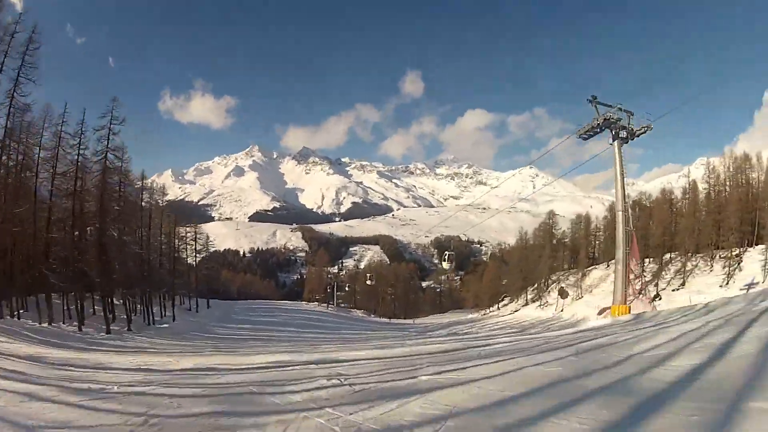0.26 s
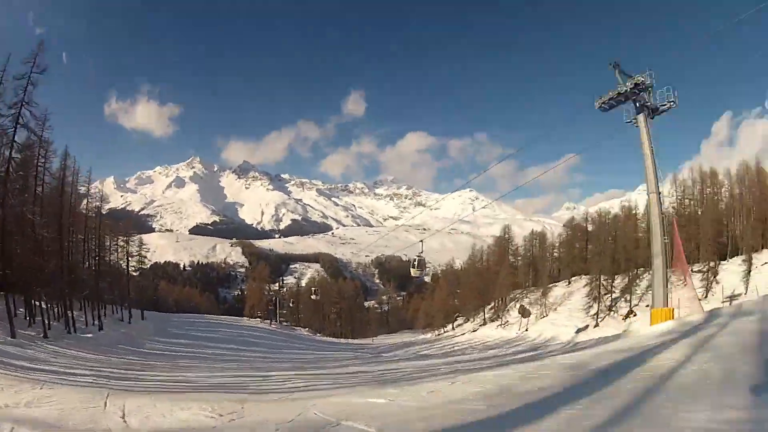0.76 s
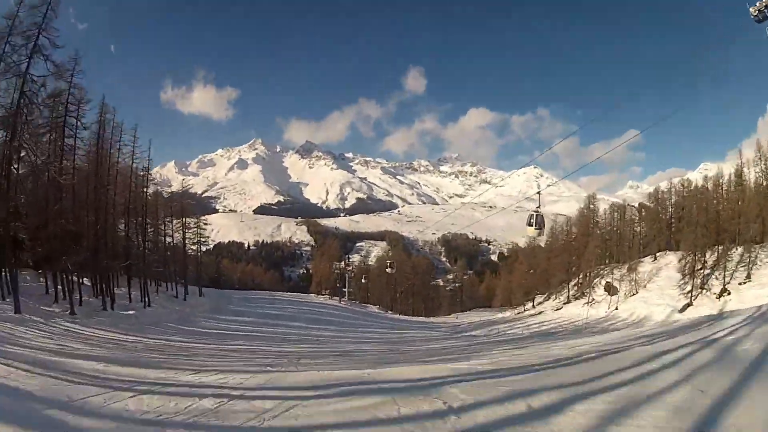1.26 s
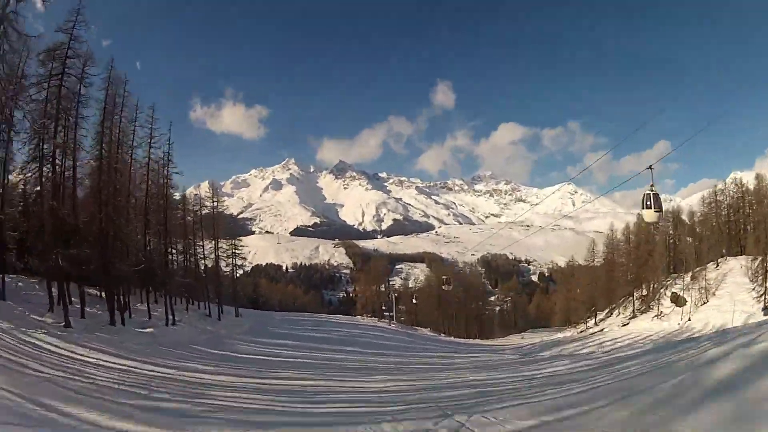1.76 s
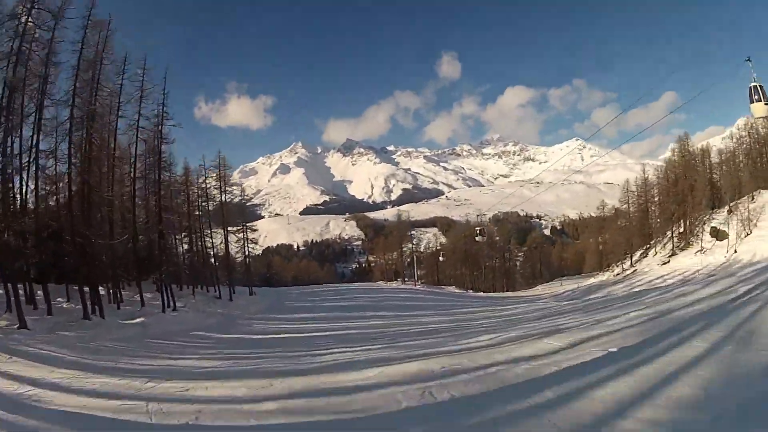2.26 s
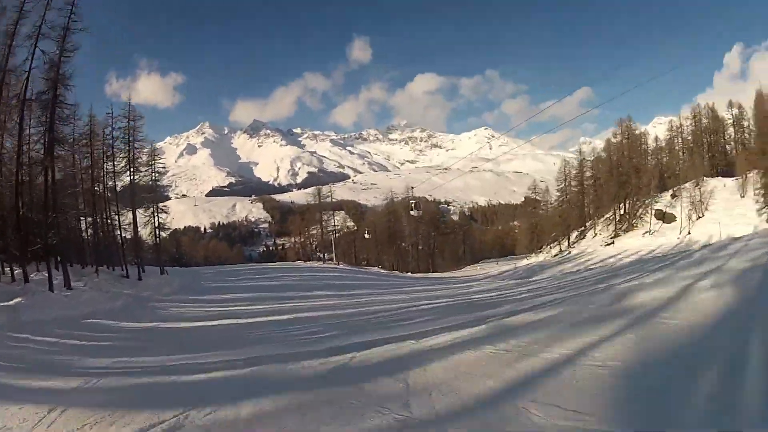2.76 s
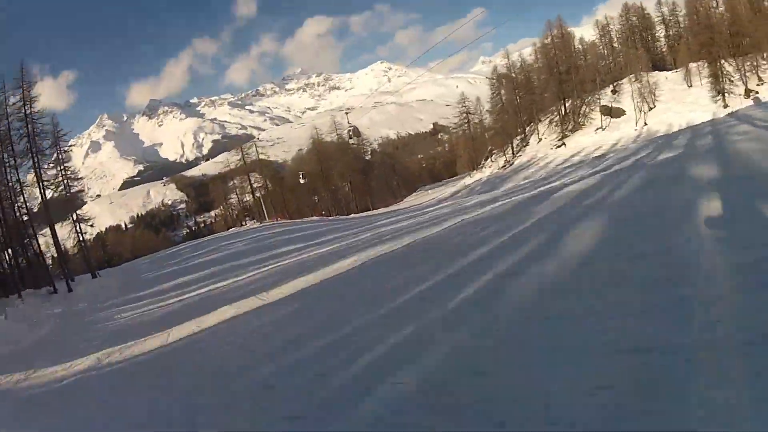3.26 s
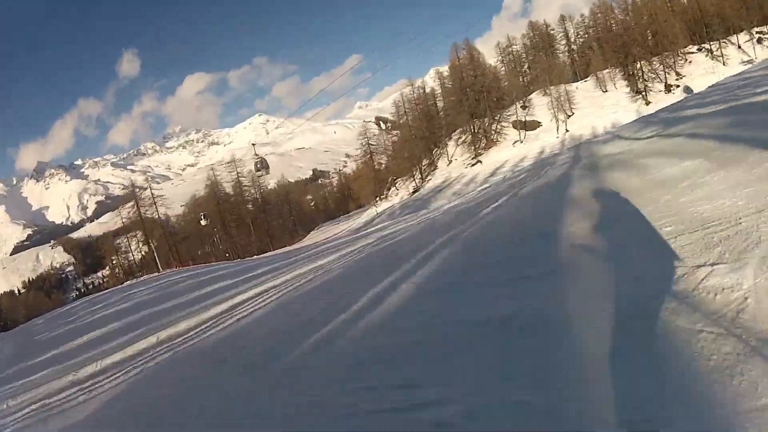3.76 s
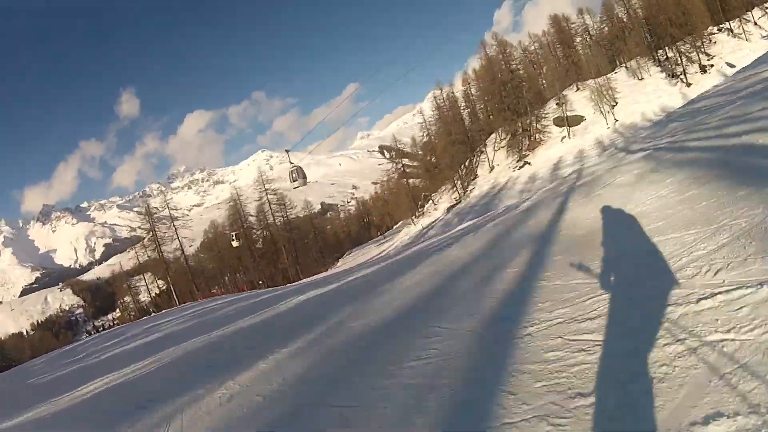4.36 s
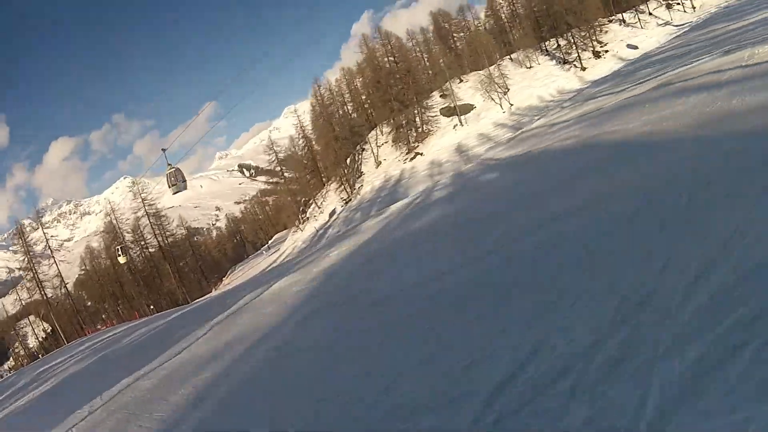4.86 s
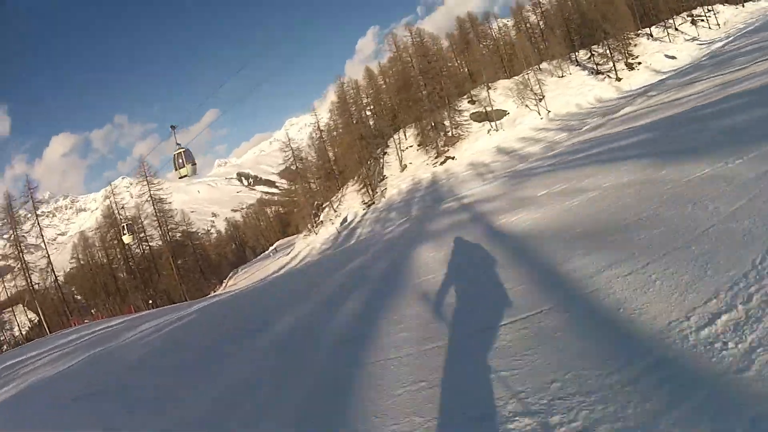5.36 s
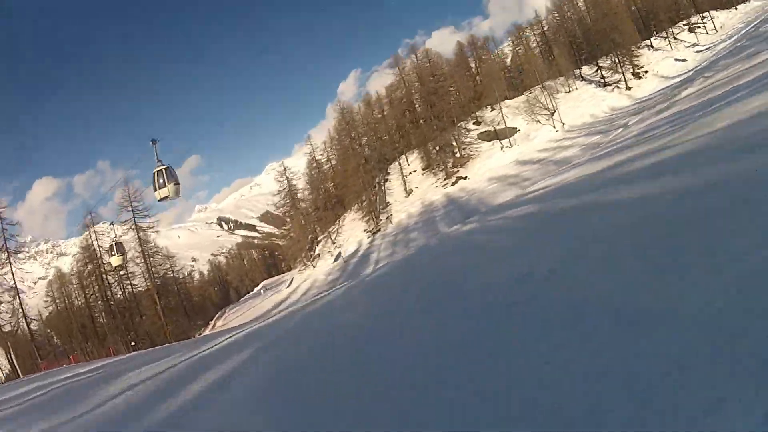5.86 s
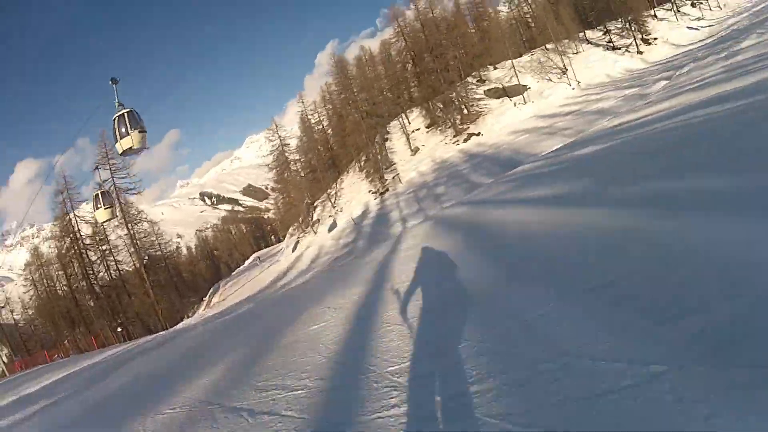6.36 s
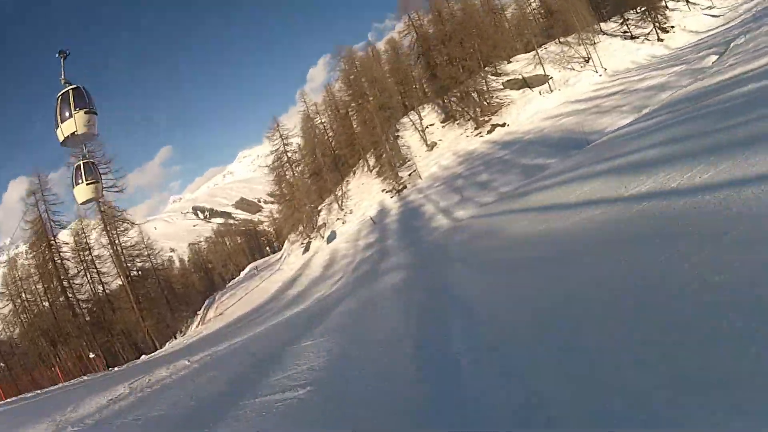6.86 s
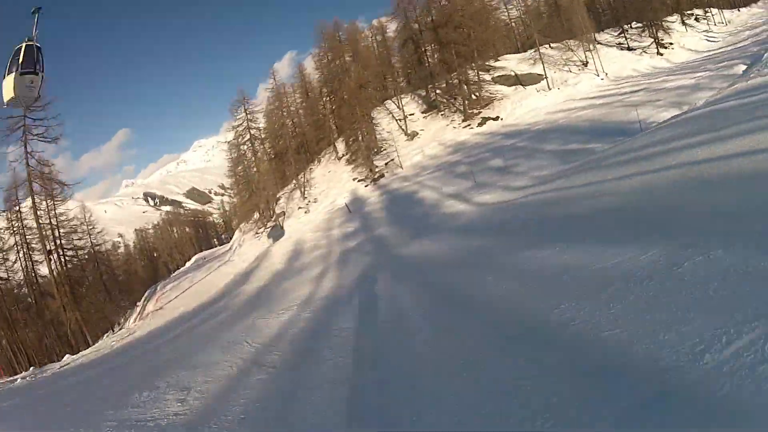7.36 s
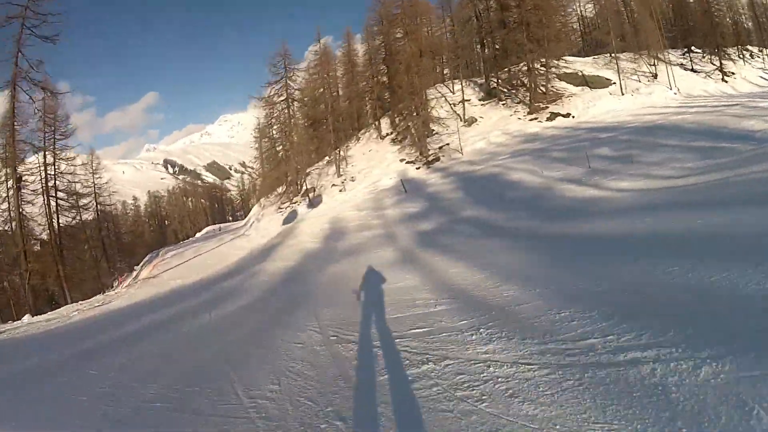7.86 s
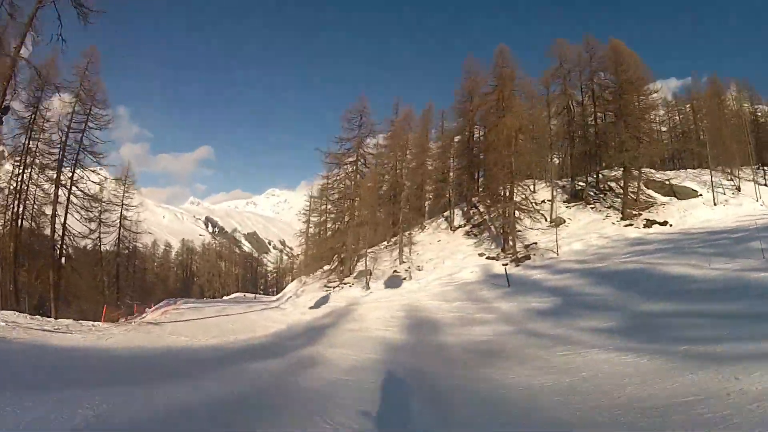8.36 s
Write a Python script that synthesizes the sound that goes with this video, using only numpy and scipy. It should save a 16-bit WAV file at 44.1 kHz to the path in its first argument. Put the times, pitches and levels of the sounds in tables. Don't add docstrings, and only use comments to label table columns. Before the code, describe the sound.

Continuous ski scrape on groomed snow, heard close through a small plastic case: hollow, nasal, crackly midrange with fine spray hiss. Crust lumps tick early, one hard knock just before one second. Scrape and wind swell together to about four seconds, sink to a quiet rasp around seven, then rise at the end. Open slope, no echo, coarse low-quality microphone.

```python
import sys
import numpy as np
from scipy import signal
from scipy.io import wavfile
from scipy.ndimage import uniform_filter1d

SR = 44100
rng = np.random.default_rng(int(sys.argv[2]) if len(sys.argv) > 2 else 0)


def decibels_to_gain(level_db):
    exponent = np.asarray(level_db, float) / 20
    return 10 ** exponent


def generate_wav(signal):
    frames = np.transpose(np.atleast_2d(signal))
    scaled = np.clip(frames, -1, 1) * 32767
    pcm = np.round(scaled).astype(np.int16)
    wavfile.write(sys.argv[1], SR, pcm)


N = 380583

# (time [s], scrape level [dB], snow hardness [dB], ski flatness [dB])
EDGE_LOAD = [(0, -46, -1.5, -0.5), (.2, -40.5, -5.5, 1.5), (.36, -44, -1.5, -3), (.55, -45.5, 0, 1),
             (.84, -43, 0.5, -0.5), (.98, -39.5, 0.5, -0.5), (1.5, -39, 0.5, -0.5), (1.85, -39.5, 1, 2),
             (2.7, -37.5, -1.5, 0), (3.2, -34.5, 0.5, -0.5), (4.08, -32, 1, 0.5), (4.45, -36.5, -1, 2),
             (4.7, -35, 0.5, -1.5), (5.7, -41.5, -0.5, 0), (6.1, -43, 3.5, 2), (6.8, -48, 0, 0.5),
             (7.95, -48, -0.5, 0.5), (8.63, -40, 1, -1)]
# (time [s], change [dB], half length [s])
RIDGES = [(0.264, 4, 0.046), (0.448, -8, 0.023), (1.453, 3.5, 0.037), (2.01, -5, 0.051),
          (2.108, -8, 0.0087), (2.26, 1, 0.014), (2.336, 2, 0.019), (2.4, -3, 0.029), (2.46, 0.5, .03),
          (2.656, -5, 0.024), (3.08, 4, 0.036), (3.775, -1.5, 0.028), (4.383, 2, 0.023), (4.49, -2, 0.028),
          (4.662, 0, .03), (5.333, -2.5, 0.025), (5.45, 1, 0.049), (5.728, 4, 0.028), (5.87, 7, 0.021),
          (5.915, 6, 0.021), (6.378, 0, 0.0085), (6.693, 7, 0.007), (6.895, -10, 0.021), (7.088, 7, 0.022),
          (7.345, 0, .04), (7.488, 5, 0.016), (7.68, 3, 0.045), (7.79, -2, 0.021), (8.42, 2, 0.024),
          (8.52, 0, .03)]
# (time [s], rise [dB], length [s])
EDGE_DIGS = [(0.319, 5, 0.013), (0.485, 5, 0.012), (0.62, 5, 0.011), (0.766, 0, 0.0054), (1.035, 1, 0.013),
             (1.196, 3, 0.0088), (3.216, 1, 0.022), (4.648, 3, 0.032), (5.79, 7, 0.016), (6.92, 4, 0.0061),
             (7.036, 7.5, 0.023), (7.262, 6, 0.027), (8.386, 1.5, 0.021), (8.417, 4.5, 0.012),
             (8.511, 5, 0.022), (8.598, 1.5, 0.011)]
# (time [s], rise [dB], half length [s])
GLAZED_PATCHES = [(.12, 3, .12), (.31, 0.5, .05), (.493, 5, 0.01), (.63, 2.5, 0.013), (2.05, -1, 0.1),
                  (3.77, 1, 0.078), (4.0, 0.5, 0.068), (6.15, 2, 0.051), (6.5, -4, 0.081), (7.6, 1, .1),
                  (8.3, 1, .06), (8.415, 6.5, 0.022), (8.52, 0, .02)]
# (frequency [Hz], width [Hz], level [dB])
AIR_MODES = [
    (1672, 545, -4.5),
    (2030, 330, 3),
    (2353, 260, 2),
]
# (frequency [Hz], width [Hz], level [dB])
HOLLOW_MODES = [
    (1220.6, 275, 5.5),
    (902, 1100, -6.5),
]
# (frequency [Hz], width [Hz], level [dB])
WALL_MODES = [
    (3192, 300, -2),
    (3630, 120, -1.5),
    (4045, 340, -14),
]
# (time [s], rush level [dB], squareness of its strike [dB])
AIRFLOW = [(0, -49, -2), (.42, -52, -2), (.9, -47.5, -2.5), (1.35, -48, -1), (1.75, -46, -4),
           (2.1, -47.5, -5), (2.45, -46.5, -3.5), (2.8, -41.5, 0.5), (3.3, -41.5, 2), (3.75, -39.5, -2),
           (4.2, -41.5, 3), (5.1, -45, 0), (5.55, -43, -3.5), (6, -46.5, -0.5), (6.7, -53.5, 0),
           (7.4, -52, -2.5), (8, -52, -4), (8.63, -48.5, 2.5)]
# (time [s], peak level [dB], ring frequency [Hz], ring time [s])
CRUST_LUMPS = [(0.3214, -27, 3130, 0.029), (0.4863, -25, 3180, 0.01), (0.6255, -26.5, 1900, 0.017),
               (0.7662, -28, 2070, 0.022), (0.877, -11.5, 2060, 0.013), (0.9162, -22, 1910, 0.021),
               (0.9592, -24, 1990, 0.014), (1.0321, -25, 2030, 0.018), (1.1977, -17.5, 2010, 0.027),
               (2.1161, -24, 1950, 0.011), (2.4219, -27, 2000, 0.014), (4.78, -17, 3320, 0.016),
               (6.6538, -27, 2030, 0.023), (6.6812, -31, 2040, 0.015), (6.9127, -29, 2050, 0.016),
               (7.0339, -27, 2110, 0.0083), (7.21, -33.5, 2230, 0.02), (7.4654, -27, 1960, 0.015),
               (8.1085, -21.5, 1180, 0.015), (8.2796, -34, 2140, 0.013)]
# (time [s], peak level [dB], length [s])
DUST_PUFFS = [
    (1.028, -39, 0.012),
    (1.397, -40, 0.009),
    (2.916, -37, 0.0072),
    (4.001, -37, 0.06),
    (3.306, -37, 0.0081),
    (4.54, -34.5, 0.009),
    (4.786, -38, 0.0085),
    (5.801, -37, 0.009),
    (7.246, -37, 0.008),
    (7.503, -37.5, 0.005),
]
STARVED_FRAMES = [148, 149, 160, 162, 166, 177, 181, 205, 215, 257, 258, 262, 267, 269]

MID_LOAD_DB, MID_RUSH_DB = -40, -46
HOLLOW_DB, HOLLOW_PER_DB, HOLLOW_LAG = -8, -0.08, 0.5
ICE_DB, ICE_PER_DB, ICE_LAG = -5, 0.09, 0.44
SPRAY_DB, SPRAY_PER_DB, SPRAY_LAG = -14, -0.11, 0.76
HARD_ICE, HARD_SPRAY, FLAT_ICE = 0.33, 1.2, -0.3
GLAZE_SPRAY = 0.24
DEEP_DB, DEEP_PER_DB = -6.5, -0.78
UPPER_DB, UPPER_PER_DB = -6, 0.56
SLOW_RATE, HELD_RATE = 12000, 48000
FRAME, FIRST_FRAME_S = 1024, 0.0035
TOP_LINE, BAND_LINES = 652, 8


def unit(x):
    return x / np.sqrt(np.mean(x ** 2))


def curves(table):
    s, *columns = np.transpose(table)
    return [np.interp(np.arange(N) / SR, s, column) for column in columns]


def band(x, lo_hz, hi_hz, order=2):
    return signal.sosfilt(signal.butter(order, [lo_hz, hi_hz], "band", fs=SR, output="sos"), x)


def ring(x, modes):
    total = 0
    for k, (hz, width, db) in enumerate(modes):
        b, a = signal.iirpeak(hz, hz / width, SR)
        total = total + (-1) ** k * decibels_to_gain(db) * signal.lfilter(b, a, x)
    return total


def walk(rate):
    k = int(SR / rate)
    held = np.repeat(rng.standard_normal(N // k + 1), k)
    slewed = uniform_filter1d(uniform_filter1d(held, k), k)
    return unit(slewed[:N])


def crystals(rate, scatter_db):
    when, size, sign = rng.random(N), rng.exponential(size=N), rng.standard_normal(N)
    strength = decibels_to_gain(np.minimum(scatter_db * size, 8))
    return unit((when < rate / SR) * sign * strength)


def bites(rate, fall_s, depth_db):
    catch = (rng.random(N) < rate / SR) * np.minimum(rng.exponential(size=N), 2)
    jump = signal.lfilter([1], [1, -np.exp(-1 / (fall_s * SR))], catch)
    return depth_db * (jump - jump.mean())


def bumps(table):
    t = np.arange(N) / SR
    return sum(db * np.exp(-((t - s) / half) ** 2) for s, db, half in table)


def digs():
    t = np.arange(N) / SR
    return sum(db * (t > s) * np.exp(-((t - s) / length) ** 2) for s, db, length in EDGE_DIGS)


def skis():
    load_db, hard_db, flat_db = curves(EDGE_LOAD)
    bump_db, glaze_db = bumps(RIDGES), bumps(GLAZED_PATCHES)
    scrape_db, load = load_db + bump_db, load_db - MID_LOAD_DB

    hollow_db = HOLLOW_DB + HOLLOW_PER_DB * load - HOLLOW_LAG * bump_db
    hollow_db = hollow_db + flat_db + 0.8 * walk(12)
    icy_db = ICE_DB + ICE_PER_DB * load - ICE_LAG * bump_db
    icy_db = icy_db + HARD_ICE * hard_db + FLAT_ICE * flat_db + glaze_db + 0.9 * walk(12)
    spray_db = SPRAY_DB + SPRAY_PER_DB * load - SPRAY_LAG * bump_db
    spray_db = spray_db + HARD_SPRAY * hard_db + GLAZE_SPRAY * glaze_db + 0.95 * walk(11)
    chatter = digs() + bites(45, fall_s=0.0065, depth_db=1.2) + 0.5 * walk(22)

    shear = rng.standard_normal(N) + 0.8 * crystals(1500, scatter_db=1.66)
    body = unit(ring(shear, AIR_MODES)) * decibels_to_gain(0.46 * walk(30))
    hollow = unit(ring(shear, HOLLOW_MODES)) * decibels_to_gain(hollow_db + 0.43 + 0.26 * walk(25))
    icy = -unit(ring(shear, WALL_MODES)) * decibels_to_gain(icy_db + 2.5 + 0.58 * walk(30))
    dust = rng.standard_normal(N) + 0.56 * crystals(900, scatter_db=2.2)
    spray = unit(band(dust, 2850, 7000)) * decibels_to_gain(spray_db + 5.5 - 0.11 * chatter + 1.0 * walk(18))
    return decibels_to_gain(scrape_db + chatter + 0.15) * (body + hollow + icy + spray)


def wind():
    rush_db, square_db = curves(AIRFLOW)
    excess_db = rush_db - MID_RUSH_DB
    deep_db = DEEP_DB + DEEP_PER_DB * excess_db + 1.4 * walk(4)
    upper_db = UPPER_DB + UPPER_PER_DB * excess_db + square_db + 0.62 * walk(6)
    deep = unit(band(rng.standard_normal(N), 14, 46)) * decibels_to_gain(deep_db)
    rush = unit(band(rng.standard_normal(N), 55, 290)) * decibels_to_gain(0.7 * walk(12))
    upper = unit(band(rng.standard_normal(N), 260, 532, order=1)) * decibels_to_gain(upper_db - 1.5 + 0.89 * walk(12))
    return decibels_to_gain(rush_db + 1.75) * (deep + rush + upper)


def knocks():
    out, t = np.zeros(N + SR), np.arange(SR // 10) / SR
    for s, db, hz, ring_s in CRUST_LUMPS:
        swell = t ** 2 * np.exp(-np.log(1000) * t / max(0.33 * ring_s, 0.002))
        swell = swell / swell.max()
        rough = 1 + 0.12 * uniform_filter1d(rng.standard_normal(len(t)), size=6)
        tone = decibels_to_gain(db - 5) * swell * rough * np.sin(2 * np.pi * hz * t)
        noise = band(rng.standard_normal(len(t)), hz * 0.62, min(hz * 2.2, 5500))
        crack = decibels_to_gain(db - 11.5) * noise * swell ** 1.1
        out[int(s * SR):][:len(t)] += tone + crack
    return out[:N]


def puffs():
    out, t = np.zeros(N + SR), np.arange(SR // 10) / SR
    for s, db, length in DUST_PUFFS:
        hiss = band(rng.standard_normal(len(t)), 3900, 7000)
        fade = np.exp(-(t / max(length, 0.002)) ** 2)
        out[int(s * SR):][:len(t)] += decibels_to_gain(db + 6) * hiss * fade
    return out[:N]


def scene():
    return (skis() + wind() + knocks() + puffs())[None]


def camera_frames(x):
    n, k = np.arange(2 * FRAME), np.arange(FRAME)
    window = np.sin(np.pi * (n + 0.5) / (2 * FRAME))
    basis = window[:, None] * np.cos(np.pi / FRAME * np.outer(n + (FRAME + 1) / 2, k + 0.5))
    lead = FRAME - int(FIRST_FRAME_S * HELD_RATE)
    count = len(x) // FRAME + 2
    hops = np.pad(x, (lead, (count + 1) * FRAME - lead - len(x))).reshape(-1, FRAME)
    lines = np.c_[hops[:-1], hops[1:]] @ basis
    size = np.sqrt(np.mean(lines.reshape(count, -1, BAND_LINES) ** 2, axis=2))
    loudest = size.max(axis=1, keepdims=True)

    hz = (np.arange(size.shape[1]) + 0.5) * BAND_LINES * HELD_RATE / (2 * FRAME)
    waver_db = 5.5 * uniform_filter1d(rng.standard_normal(size.shape), size=3, axis=0)
    floor_db = np.where(abs(hz - SLOW_RATE) < 880, -17.5, -23)
    floor_db = floor_db + 5.5 * (abs(hz - SLOW_RATE / 2) < 330) + waver_db
    floor = uniform_filter1d(loudest, size=15, axis=0) * decibels_to_gain(floor_db)
    step = np.maximum(0.9 * size, floor)

    bright = hz > 3900
    spared = (abs(hz - SLOW_RATE) < 1500) | (hz > 15000) | (hz < 400)
    coarse = np.where(bright, 5.1, 2.8) * uniform_filter1d(size, size=5)
    coarse = np.maximum(coarse, decibels_to_gain(-3) * loudest * ~bright)
    starved_step = np.where(spared, np.maximum(2 * size, step), coarse)
    step[STARVED_FRAMES] = starved_step[STARVED_FRAMES]

    step = np.repeat(step, BAND_LINES, axis=1) + 1e-12
    lines = np.sign(lines) * np.floor(abs(lines) / step + 0.4) * step * (k < TOP_LINE)
    back = lines @ basis.T * 2 / FRAME
    rising = np.r_[back[:, :FRAME], hops[:1]]
    falling = np.r_[hops[:1] * 0, back[:, FRAME:]]
    return (rising + falling).ravel()[lead:lead + len(x)]


def top_cut(x):
    return signal.sosfilt(signal.butter(12, 16630, fs=SR, output="sos"), x)


def record(dry):
    smooth = signal.sosfilt(signal.ellip(6, 0.5, 40, 5760, fs=SR, output="sos"), dry[0])
    slow = signal.resample_poly(smooth, SLOW_RATE, SR, window=("kaiser", 3.0))
    held = np.repeat(slow, HELD_RATE // SLOW_RATE)
    back = signal.resample_poly(camera_frames(held), SR, HELD_RATE)
    mix = np.pad(back, (0, 8))[None, :N]
    return top_cut(mix)


dry = scene()
out = record(dry)
generate_wav(out)
```